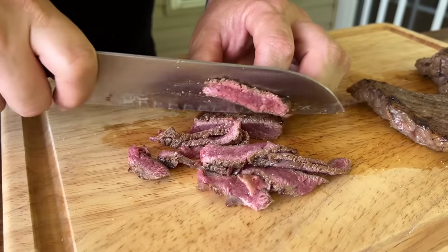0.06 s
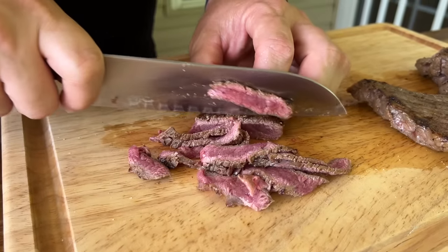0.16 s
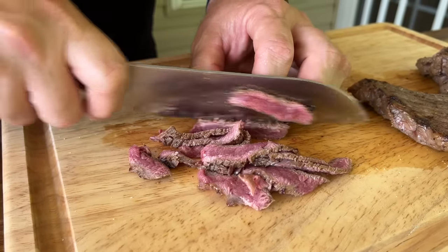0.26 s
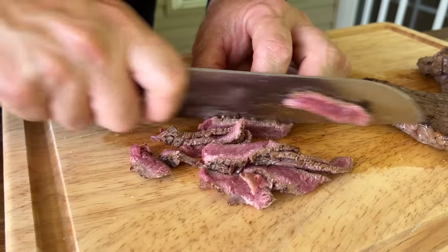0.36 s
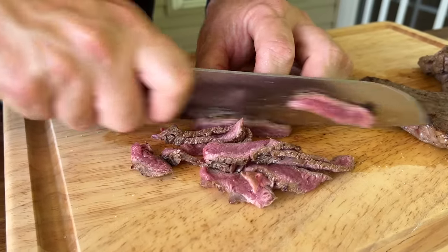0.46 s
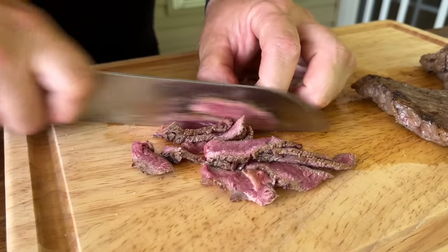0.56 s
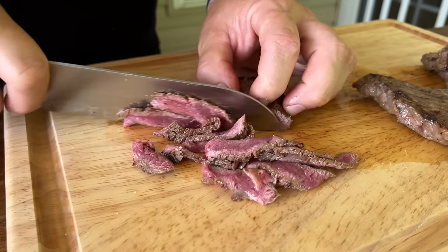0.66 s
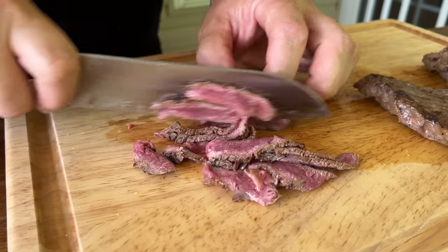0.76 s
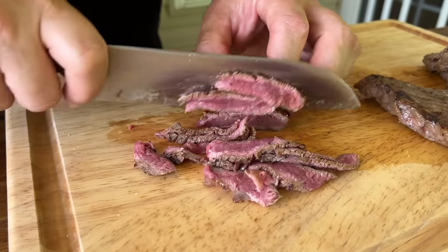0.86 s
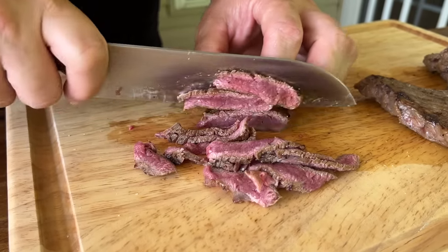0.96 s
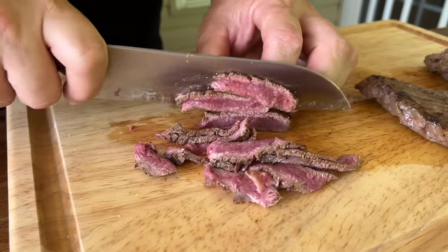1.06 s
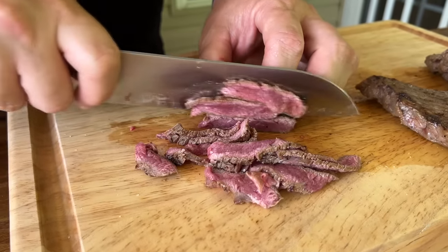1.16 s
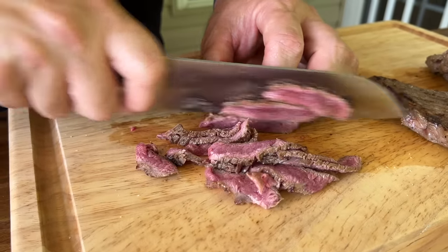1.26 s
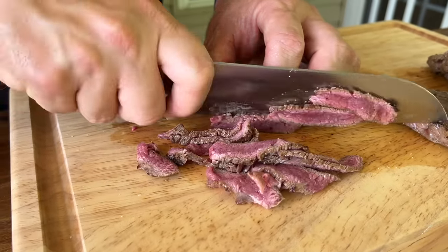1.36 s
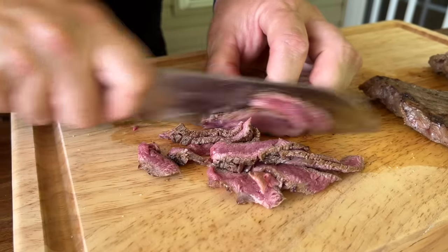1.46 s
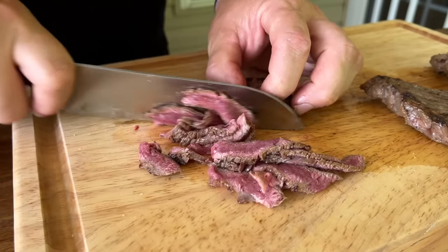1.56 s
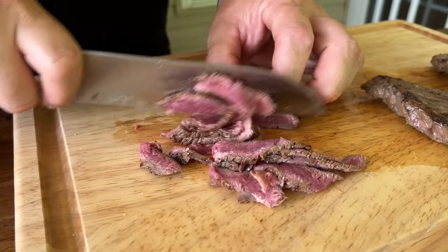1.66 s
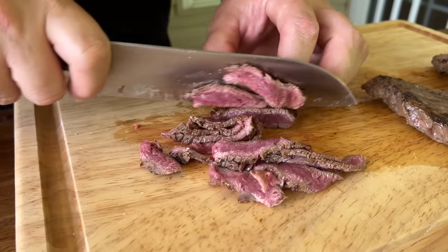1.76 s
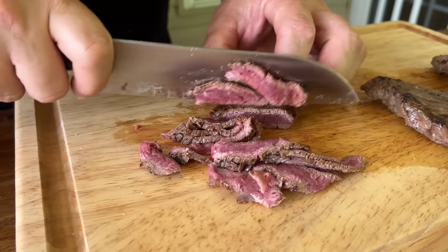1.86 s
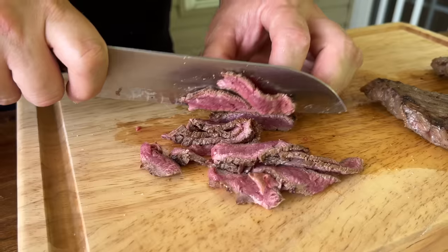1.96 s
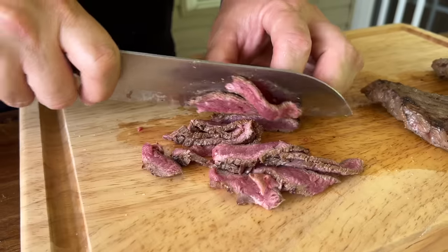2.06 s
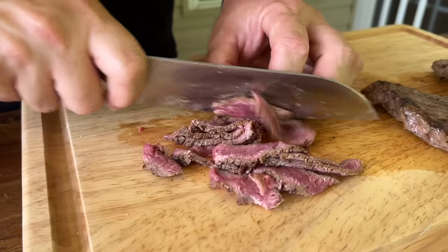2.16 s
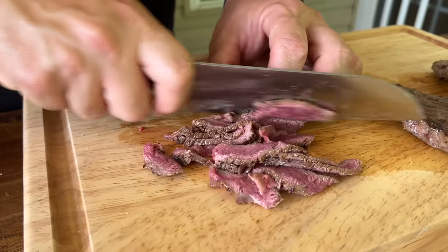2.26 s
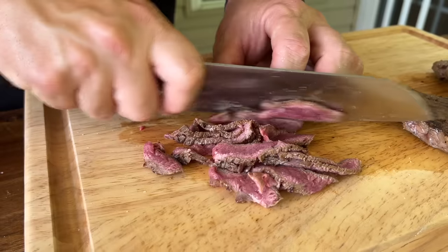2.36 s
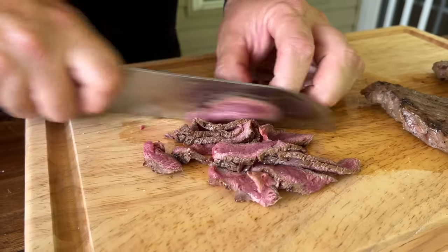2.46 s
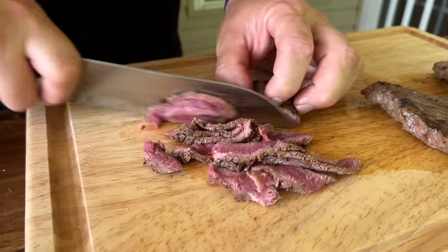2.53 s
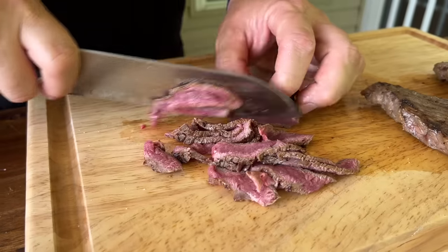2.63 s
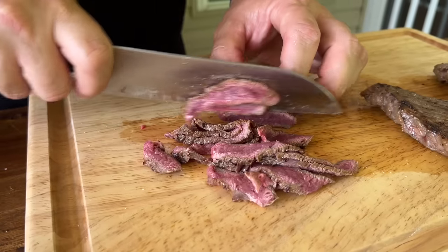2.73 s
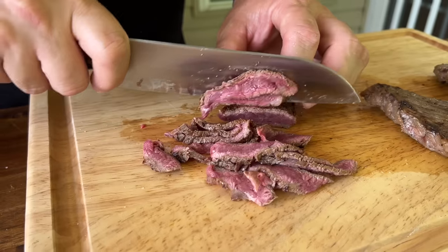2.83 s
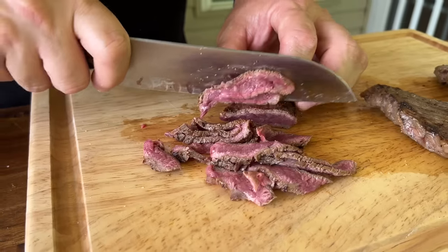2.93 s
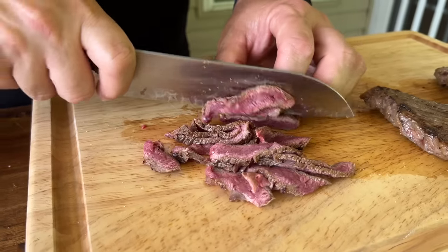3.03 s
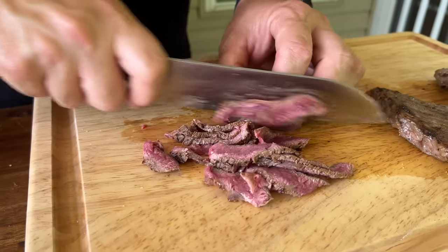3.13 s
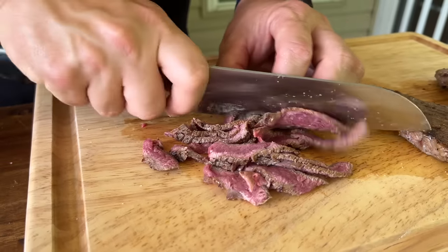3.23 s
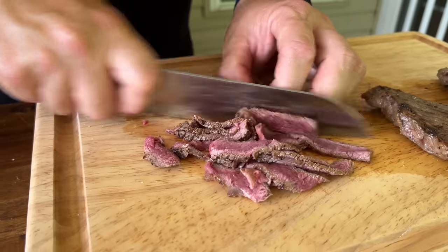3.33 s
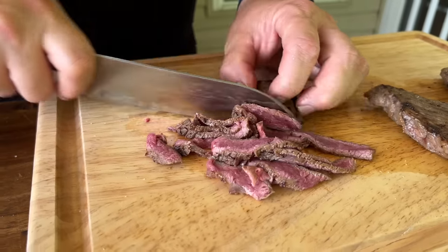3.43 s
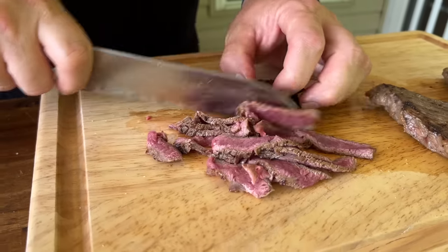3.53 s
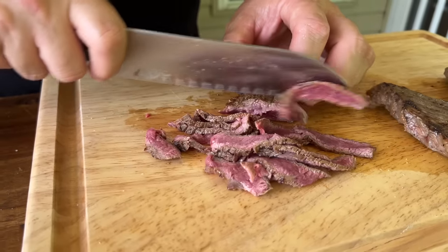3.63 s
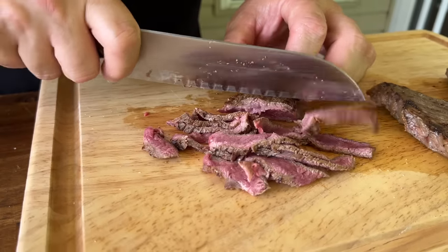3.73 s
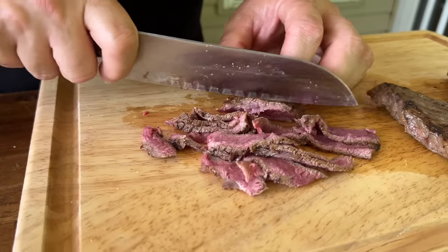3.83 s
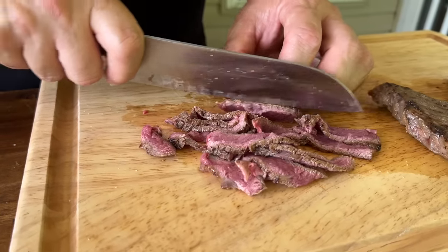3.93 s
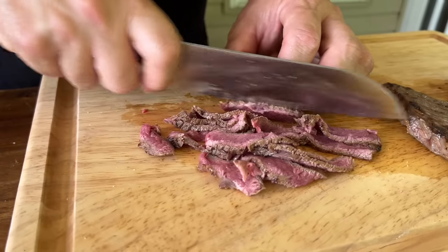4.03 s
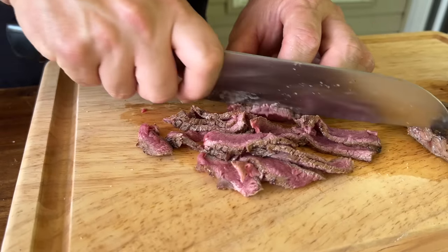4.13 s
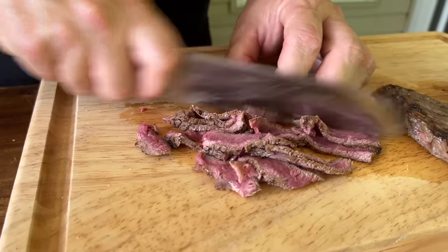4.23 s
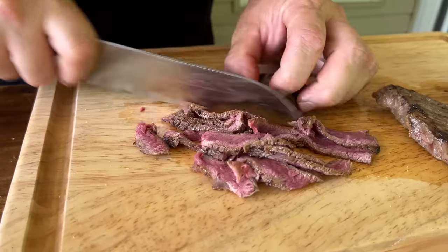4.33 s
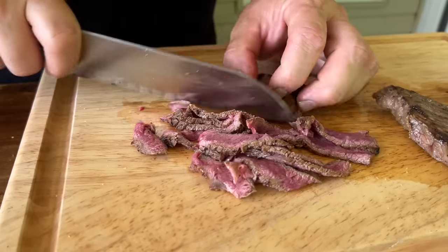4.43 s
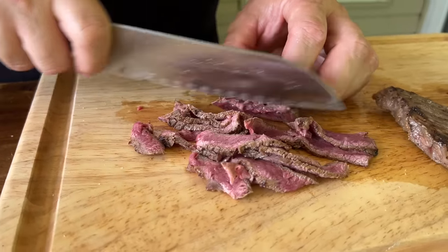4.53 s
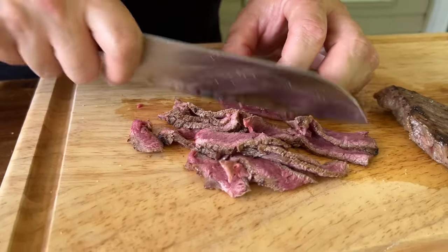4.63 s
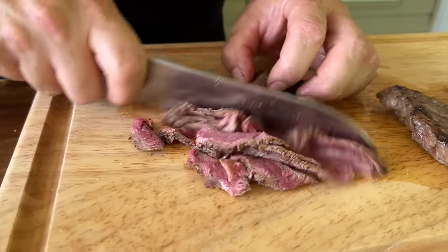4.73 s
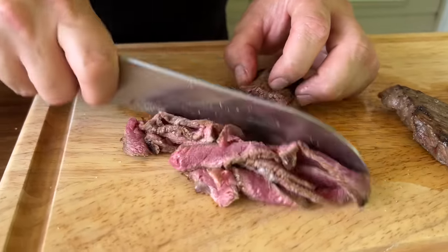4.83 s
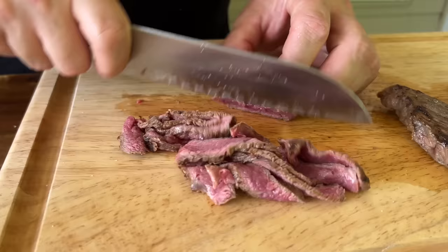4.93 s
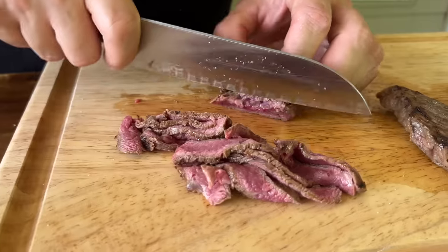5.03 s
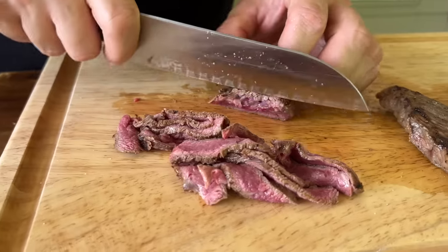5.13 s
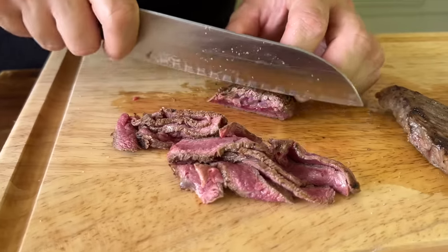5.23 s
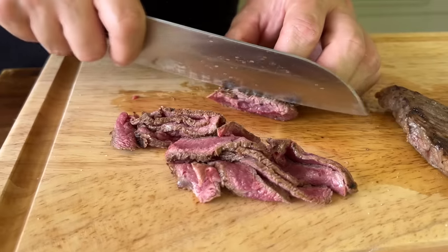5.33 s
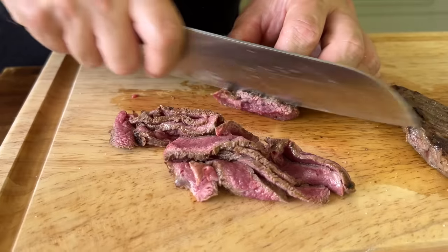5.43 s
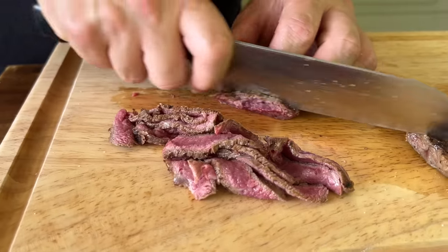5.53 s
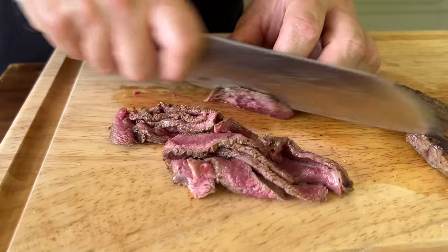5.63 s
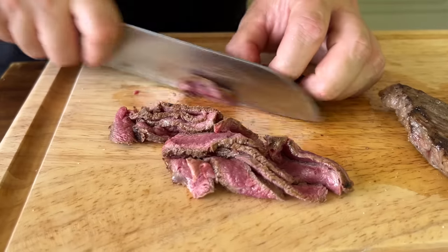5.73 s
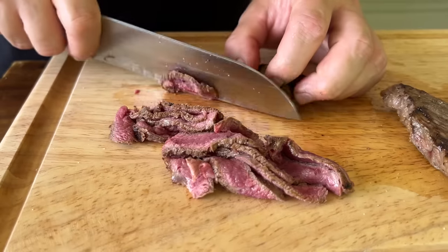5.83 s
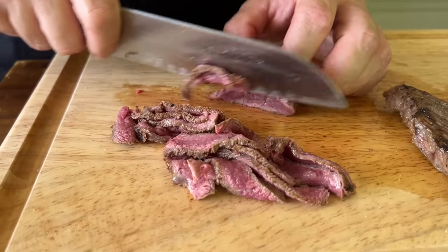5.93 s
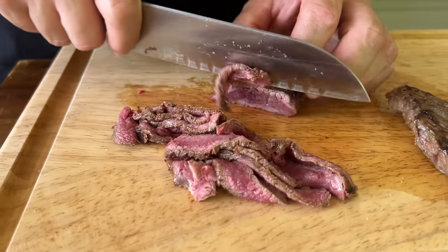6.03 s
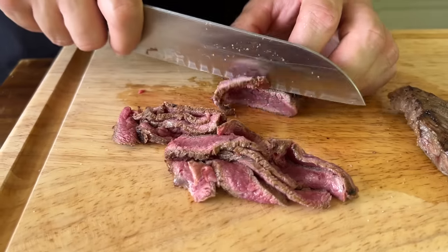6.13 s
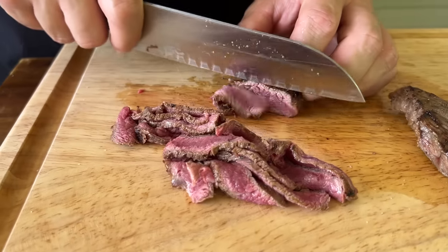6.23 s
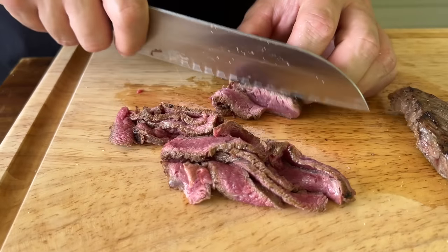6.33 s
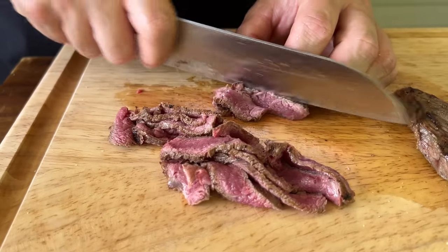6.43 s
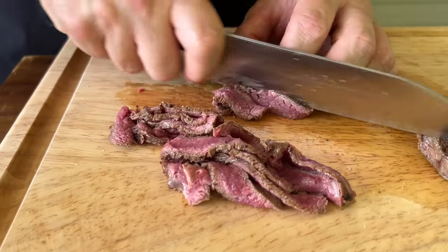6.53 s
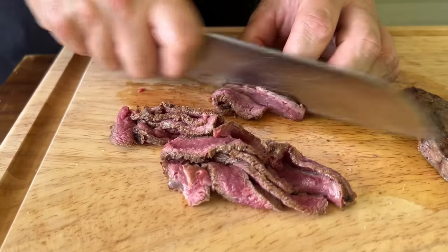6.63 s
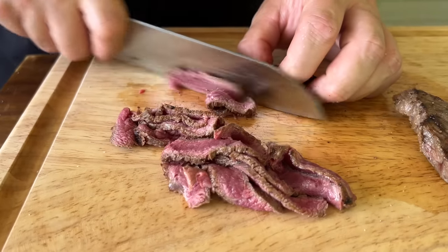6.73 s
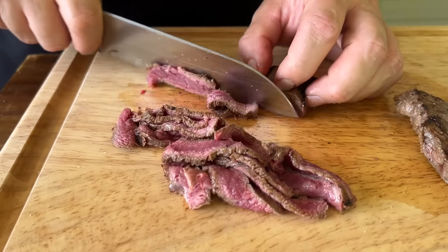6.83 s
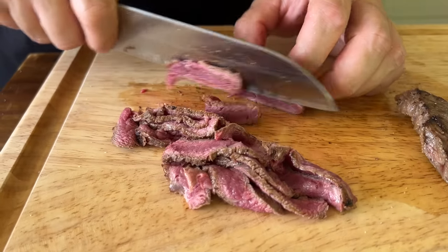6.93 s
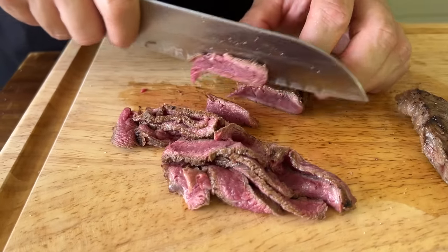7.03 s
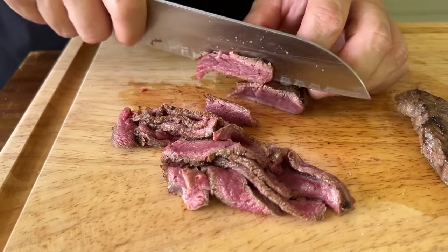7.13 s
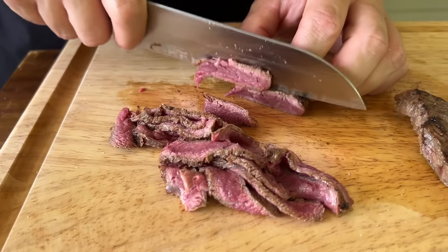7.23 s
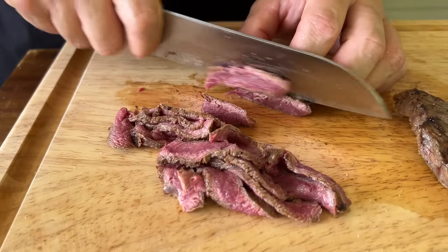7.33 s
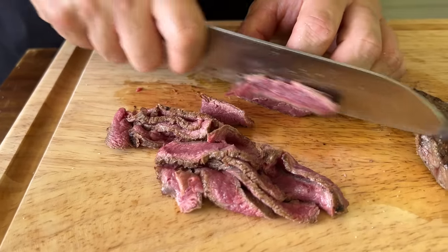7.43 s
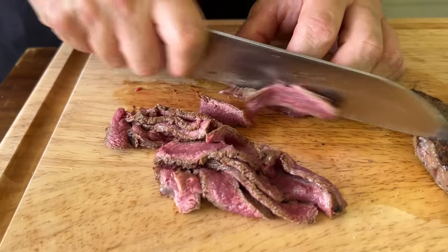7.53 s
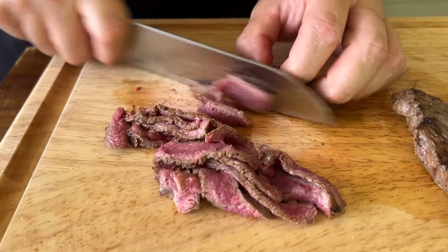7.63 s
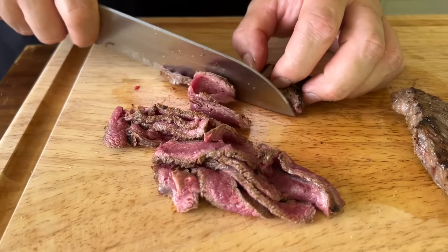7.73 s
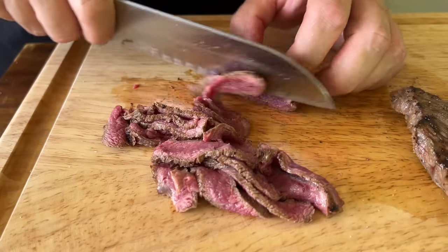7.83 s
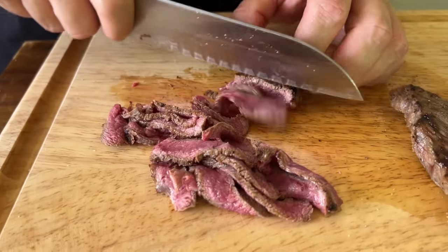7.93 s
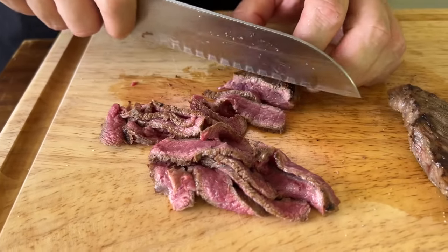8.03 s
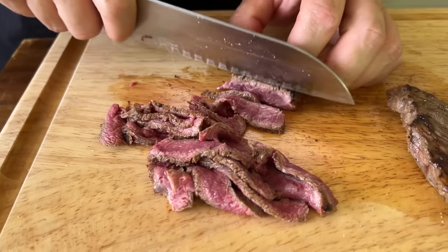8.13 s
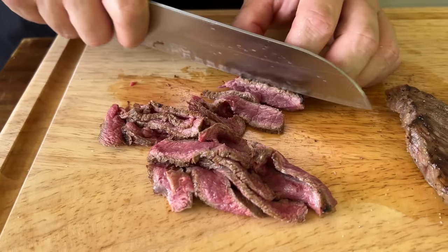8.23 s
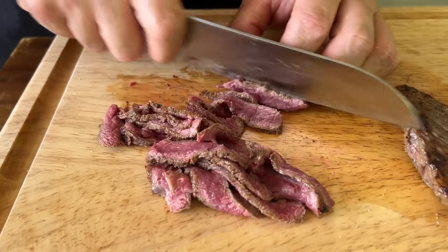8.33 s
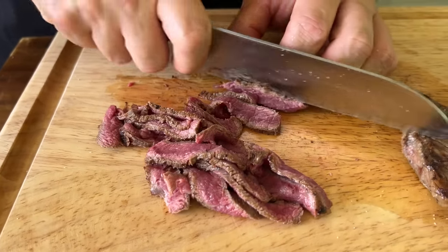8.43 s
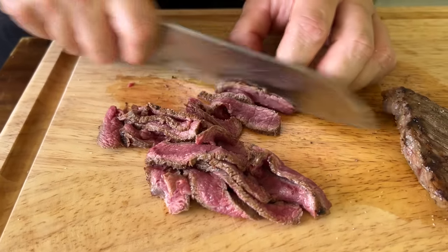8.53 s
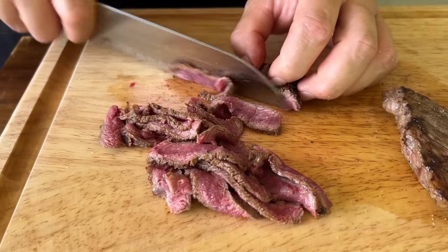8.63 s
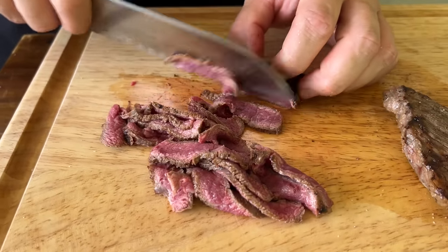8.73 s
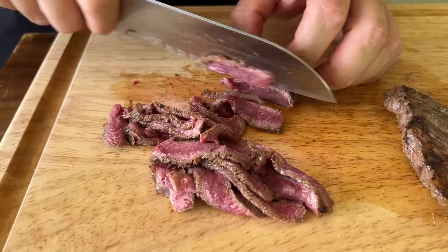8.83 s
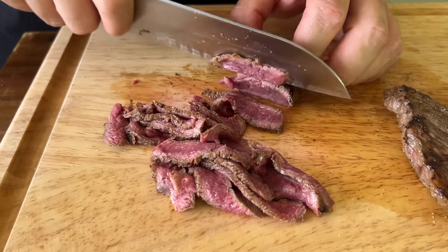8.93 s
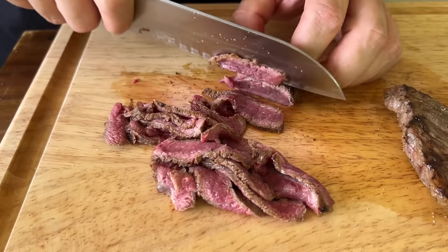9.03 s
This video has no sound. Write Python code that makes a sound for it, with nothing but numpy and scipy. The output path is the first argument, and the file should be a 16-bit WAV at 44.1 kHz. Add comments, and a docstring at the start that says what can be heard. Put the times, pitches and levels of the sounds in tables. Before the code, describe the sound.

Ten woody blade knocks land at an unhurried, regular pace, some soft and cushioned by meat, others sharp and loud. Fat hisses and pops continuously on the left, livelier in the first half. Just after the sixth knock the blade sweeps slices aside with a very short ringing rasp. Soft airy background and low breeze thumps surround the close board, with short reflections from nearby surfaces.

```python
"""Slicing meat beside a sizzle

A knife slices meat on a wooden board: each knock sets the wood's resonances ringing, with echoes and a room tail.
Once the blade sweeps the slices aside, and its rubbing noise rings in the steel.
On the left something sizzles and spits: noise and short bursts, differing in colour and phase at two microphone ports.
Gusts rumble on the ports as low noise, over a soft floor of air noise. The whole level dips once, briefly."""
import sys
import numpy as np
from scipy import signal
from scipy.fft import rfft, irfft
from scipy.io import wavfile

SR = 44100
rng = np.random.default_rng(int(sys.argv[2]) if len(sys.argv) > 2 else 0)


def volts_from_decibels(level):
    """Turn decibel levels (scalar or array-like) into linear amplitude factors."""
    exponent = np.asarray(level, float) / 20
    return 10 ** exponent


def master_out(mix):
    """Clip the mix to full scale and print it as 16-bit PCM to the path in sys.argv[1]."""
    frames = np.transpose(np.atleast_2d(mix))
    ceiling = np.clip(frames, -1, 1)
    pcm = np.round(ceiling * 32767).astype(np.int16)
    wavfile.write(sys.argv[1], SR, pcm)


N = 400428   # length in samples


def rms_one(x):
    """Scale to an rms of 1."""
    return x / np.sqrt(np.mean(x ** 2) + 1e-20)


def in_time(rows):
    """Draw straight lines between (seconds, value) points, giving a value for every sample."""
    seconds, value = np.transpose(rows)
    return np.interp(np.arange(N) / SR, seconds, value)


def coloured(x, spectrum):
    """Filter by (Hz, dB) points, joined on a logarithmic frequency axis."""
    hz = np.maximum(np.fft.rfftfreq(N, 1 / SR), 1)
    at, level_db = np.transpose(spectrum)
    gain = volts_from_decibels(np.interp(np.log(hz), np.log(at), level_db))
    return irfft(rfft(x) * gain, N)


def drift(rate_hz):
    """Slow random wandering: noise smoothed by two equal low-pass stages, scaled to a spread of 1."""
    r = np.exp(-2 * np.pi * rate_hz / SR)
    noise = rng.standard_normal(N + SR)
    return rms_one(signal.lfilter([1], [1, -2 * r, r * r], noise)[SR:])   # first second lets the filter settle


def ring(x, hz, t60):
    """A resonance: a unit click starts a sine of height 1 that falls by 60 dB in t60 seconds."""
    r, w = volts_from_decibels(-60 / (t60 * SR)), 2 * np.pi * hz / SR
    return signal.lfilter([0, np.sin(w)], [1, -2 * r * np.cos(w), r * r], x + 1e-18)


def pair(likeness):
    """Two noises, one per port, that share part of themselves."""
    alike = np.clip(likeness, 0, 1)
    mid, side = rng.standard_normal((2, N))
    return np.sqrt(1 + alike) * mid + np.sqrt(1 - alike) * side * [[1], [-1]]


# Colour of the air noise. Each row: frequency in Hz, relative level in dB per Hz.
AIR_COLOUR = [(15, -34), (25, -30), (76, 0), (238, -9.5), (659, -20), (972, -15.5), (1200, -32),
              (1560, -81), (2640, -120)]


def air():
    """Steady soft noise, mostly low and largely shared by both ports."""
    air_db = -51.5
    return volts_from_decibels(air_db) * rms_one(coloured(pair(0.78), AIR_COLOUR))


# Gusts on the ports. Each row: start of full strength in seconds, time held in seconds,
# level in dB before the random flutter.
GUSTS = [(1.2, .05, -44), (1.397, 0.079, -31.5), (1.798, 0.054, -33.5), (2.634, 0.086, -50),
         (3.486, .05, -35), (3.8, 0.076, -45), (4.054, .13, -45.5), (4.453, 0.33, -31), (5.1, 0.2, -45),
         (5.447, .17, -39), (5.717, 0.054, -51), (7.084, 0.039, -41), (7.89, 0.031, -42)]
# Colour of the wind. Each row: frequency in Hz, relative level in dB per Hz.
GUST_COLOUR = [(13, -38), (22, 1), (86, 3.5), (113, -6.5), (170, -14.5), (300, -28.5), (390, -54),
               (660, -120)]
# Light wind between the gusts. Each row: time in seconds, level in dB before the random flutter.
BREEZE = [(0, -48), (1.6, -45.5), (3, -49), (5.7, -48), (6.2, -51), (9.08, -51)]
GUST_RISE_S, GUST_FALL_S = 0.016, 0.022


def wind():
    """Lumpy low turbulence, largely shared by both ports; each gust swells, holds and falls away."""
    t, level = np.arange(N) / SR, volts_from_decibels(in_time(BREEZE))
    for start, length, db in GUSTS:
        rise = (t - start) / GUST_RISE_S + 1
        fall = (start + length - t) / GUST_FALL_S + 1
        level = level + volts_from_decibels(db) * np.clip(np.minimum(rise, fall), 0, 1) ** 2
    flutter = volts_from_decibels(2.0 * drift(13.0))
    return level * flutter * rms_one(coloured(pair(0.86), GUST_COLOUR))


# The right port against the left for a source on the left. Each row: frequency in Hz, level in dB,
# phase turn in radians, likeness from 0 to 1.
FAR_PORT = [(305, -1, 6, 0.1), (685, -4, -4, 1), (1100, -2.5, -3, 0.59), (2040, -1.5, -5, 0.46),
            (2290, 0.5, -6, 1), (2740, -6, -8, 0.89), (4000, -9, -8, 1), (5000, -17, -9, 0),
            (5850, -10, -7.5, 1), (5750, -31, -9, 0.1), (6570, -2.5, -8, 0.52), (8920, -3, -4, 0.4),
            (9100, 0, -np.pi, 1), (10900, 0, -np.pi, 1), (11580, 0.5, -3.7, 0), (12200, 0, 0, 1),
            (14700, 0, 0, 1), (15100, 2, 5, .4), (15900, -13, -12, .75)]


def from_left(direct, diffuse):
    """The right port hears the direct sound reshaped in level and phase, topped up by diffuse sound."""
    hz = np.fft.rfftfreq(N, 1 / SR)
    at, level_db, turn, alike = np.transpose(FAR_PORT)
    alike = np.clip(np.interp(hz, at, alike), 0, 1)
    shared = alike * np.exp(1j * np.interp(hz, at, turn)) * rfft(direct)
    mix = shared + np.sqrt(1 - alike ** 2) * rfft(diffuse)
    return np.array([direct, irfft(mix * volts_from_decibels(np.interp(hz, at, level_db)), N)])


def bursts(sizes, length_ms):
    """Each click becomes a short dying burst of noise."""
    r = np.exp(-1000 / (length_ms * SR))
    fading = signal.lfilter([1], [1, -r], np.abs(sizes))
    return sizes + 0.83 * fading * rng.standard_normal(N)


# Level of hiss and crackle together at the left port. Each row: time in seconds, level in dB.
SIZZLE = [(0.0, -39), (3.92, -39.5), (6.47, -40), (9.08, -40)]
# Their colour at the left port. Each row: frequency in Hz, relative level in dB per Hz.
SIZZLE_COLOUR = [(300, -11), (600, -6.5), (1500, -4.5), (2500, -4), (4000, -3), (5300, 0.5), (6200, -3.5),
                 (7100, -8), (8400, -6), (10500, -11), (14300, -14), (15600, -15)]


def frying(dull, sharp):
    """A dense hiss, random crackle of uneven size, and the louder spits with a dull and a sharp part."""
    hiss = rng.standard_normal(N) * volts_from_decibels(1.27 * drift(13))
    born = rng.random(N) < 150 * volts_from_decibels(3.0 * drift(2)) / SR   # crackles come at a wandering rate
    size_db = 4.1 * np.minimum(rng.exponential(1, N), 3.2)
    crackle = born * volts_from_decibels(size_db) * rng.choice([-1, 1], N)
    bed = hiss + 0.45 * rms_one(bursts(crackle, length_ms=0.89))
    bed = volts_from_decibels(in_time(SIZZLE)) * rms_one(coloured(bed, SIZZLE_COLOUR))
    body = coloured(bursts(dull, length_ms=2.74),
                    [(400, 4), (900, 6.5), (2000, 10), (3200, 11.5), (5000, 4), (9000, -40)])
    snap = coloured(bursts(sharp, length_ms=2.67), [(1500, -33), (4000, 10.5), (6500, 1.5), (12000, -5.5)])
    return bed + body + snap


# Louder spits of fat. Each row: time in seconds, size of the dull click in dB before colouring,
# sharp click against the dull one in dB before colouring.
SPITS = [(0.0213, -35.5, 5.5), (0.0557, -28, -9), (0.2013, -29, 4.5), (0.2741, -28.5, 4),
         (0.6737, -28.5, -2), (1.2785, -25, 1), (1.5724, -24.5, -7), (1.712, -30, -16), (1.963, -30, 6.5),
         (2.2387, -31.5, 1), (2.4012, -26, 1), (2.671, -30, -6), (3.1205, -26.5, -17), (3.1807, -30.5, 0.0),
         (3.5866, -29, 5), (3.6227, -36.5, 12.5), (3.7187, -26.5, 1), (4.3954, -30, -2), (4.791, -34, 6),
         (4.9036, -29.5, -5.5)]
# Lesser spits come at random and turn rare around the fade time; their size is a middle value before colouring.
SMALL_SPITS_PER_S, SMALL_SPIT_DB, SPITS_FADE_S = 4.5, -34, 5.2


def sizzle():
    """Direct and diffuse frying share the same spits but have separate hiss and crackle."""
    t = np.arange(N) / SR
    rate = SMALL_SPITS_PER_S / (1 + np.exp((t - SPITS_FADE_S) / .4))
    dull = (rng.random(N) < rate / SR) * volts_from_decibels(SMALL_SPIT_DB + 2.3 * rng.standard_normal(N))
    sharp = dull * volts_from_decibels(-8 + 5.6 * rng.standard_normal(N))
    for start, dull_db, sharp_db in SPITS:
        i = round(start * SR)
        dull[i], sharp[i] = volts_from_decibels(dull_db), volts_from_decibels(dull_db + sharp_db)
    return from_left(frying(dull, sharp), frying(dull, sharp))


# Colour of the room. Each row: frequency in Hz, gain in dB.
ROOM_COLOUR = [(150, -8), (280, 1), (420, -10.5), (700, -1.5), (1300, -2), (2200, -5.5), (4000, -20),
               (10000, -41)]
ROOM_T60_S, ROOM_ONSET_S = 0.27, 0.0042   # time to fall by 60 dB, first diffuse reflections


def room(x):
    """Dense dying reflections from table and walls, different at each port; the treble dies first."""
    t = np.arange(SR // 2) / SR
    clumps = volts_from_decibels(1.8 * drift(170)[:len(t)])   # reflections come in clumps
    noise = rng.standard_normal((2, len(t))) * clumps
    low = signal.sosfilt(signal.butter(2, 1400, fs=SR, output="sos"), noise)
    high = (noise - low) * volts_from_decibels(-60 * t / 0.17)   # extra loss on top of the common decay
    fade_in = np.clip((t - ROOM_ONSET_S) / 0.0053, 0, 1)
    tail = (low + high) * volts_from_decibels(-60 * t / ROOM_T60_S) * fade_in
    tail = tail / np.sqrt(np.sum(tail ** 2, axis=1, keepdims=True))
    return coloured(signal.fftconvolve(x[None], tail, axes=1)[:, :N], ROOM_COLOUR)


# Blade dragged sideways over the wood. Each row: time in seconds, relative level in dB.
SWEEP = [(4.69, -34), (4.701, -50), (4.71, -31.5), (4.72, -23.5), (4.728, -35), (4.74, -34.5), (4.76, -46)]
# Blade resonances. Each row: frequency in Hz, width in Hz, relative level in dB.
BLADE = [(2370, 68, -11), (3570, 28, 2.5), (4630, 15, -13.5), (6580, 83, -1), (7830, 70, -10),
         (10400, 74, -35), (11170, 70, -13.5), (15300, 97, -11)]
GLIDE = .05   # share by which the lower rings sink as the sweep slows


def sweep():
    """Rough friction noise rings in the blade's resonances above a thin broad scratch."""
    rub = rng.standard_normal(N) * volts_from_decibels(2.1 * drift(160))
    t, start, end = np.arange(N) / SR, SWEEP[0][0], SWEEP[-1][0]
    progress = np.clip((t - start) / (end - start), 0, 1)
    rings = 0
    for hz, width, db in BLADE:
        sink = GLIDE * (hz < 4000) * (.5 - progress)
        r = np.exp(-np.pi * 1.5 * width / SR)
        wobble = signal.lfilter([1], [1, -r], rub + 1j * rub[::-1])   # noise band round zero
        carrier = np.exp(2j * np.pi * hz * np.cumsum(1 + sink) / SR)   # moves the band up to the resonance
        rings = rings + volts_from_decibels(db) * np.sqrt(width) * rms_one(np.real(wobble * carrier))
    two_rubs = np.array([rub, .5 * rub + rub[::-1]])
    scratch = coloured(two_rubs, [(1500, -17), (5000, -40), (11000, 0), (15000, 13)])
    on = np.interp(t, [start - .01, start, end, end + .01], [0, 1, 1, 0])
    return on * volts_from_decibels(in_time(SWEEP)) * (rms_one(rings) * 0.88 + rms_one(scratch) * 0.98)


# Blade lands on the board. Each row: tip touch in seconds, peak in dB before echoes and port balance,
# lag from tip touch to flat landing in ms, boost of the low thud in dB, boost of the crack in dB.
KNOCKS = [(0.5398, -17.5, 1.46, -4, -13), (1.478, -17.5, 1.46, -1.5, -6), (2.446, -12, 1.37, -1, -9),
          (3.3236, -11.5, 0.75, 0, -1), (4.2503, -2.0, 0.8, -2, 2), (4.6746, -9, 0.73, -4, 0.5),
          (5.6828, -22, 1.46, -2.5, 7), (6.672, -12.5, 1.42, -3.5, -10), (7.5927, -1.5, 0.79, -5.5, -0.5),
          (8.5612, -17.5, 1.4, -2.5, -17)]
# Ways the board rings. Each row: frequency in Hz, relative level in dB, time to fall by 60 dB in seconds.
BOARD = [(267, -5, 0.04), (490, 1.5, 0.0073), (715, 6, 0.019), (984, -0.5, 0.024), (1233, -5.5, 0.013),
         (1740, -15.5, 0.047), (1850, -7.5, 0.0049), (2260, -2.5, 0.0094), (2700, -10.5, 0.0072),
         (3180, -11.5, 0.014)]
# Weak landings are cushioned by meat and last longer.
FIRM_CONTACT_MS, FIRM_ABOVE_DB, CUSHION_MS_PER_DB = 0.21, -12.5, .055
# Tip touch and rebound against the flat landing; the rebound comes this long after the tip.
TIP_SHARE, REBOUND_SHARE, REBOUND_S = 0.66, 0.35, 0.00297


def knocks():
    """Half-sine pushes of tip, flat blade and rebound ring the board; returns the rings and the bare blows."""
    rings, blows, t = np.zeros(N), np.zeros(N), np.arange(SR // 4) / SR
    chance_db = rng.standard_normal((len(KNOCKS), len(BOARD)))
    tick = np.diff(rng.standard_normal(len(t) + 1))
    no_bass = signal.butter(2, 170, "high", fs=SR, output="sos")
    for (start, peak_db, lag_ms, thud_db, crack_db), luck_db in zip(KNOCKS, chance_db):
        cushion_ms = CUSHION_MS_PER_DB * max(FIRM_ABOVE_DB - peak_db, 0)
        contact_ms = max(FIRM_CONTACT_MS + cushion_ms, .05)   # longer contacts sound duller
        push = lambda lag: np.sin(np.pi * np.clip((t - lag) / (contact_ms / 1000), 0, 1))
        force = TIP_SHARE * push(0) + push(lag_ms / 1000) - REBOUND_SHARE * push(REBOUND_S)
        hit = 0
        for k, (hz, db, t60) in enumerate(BOARD):
            level_db = db + luck_db[k] + thud_db * (hz < 400) + crack_db * (hz > 1500)
            sign = (-1) ** max(k - 1, 0)   # upper neighbours swing in opposition
            hit = hit + sign * volts_from_decibels(level_db) * ring(force, hz, t60)
        hit = signal.sosfilt(no_bass, hit)   # a small board radiates no bass
        bite = tick * np.exp(-t / .002)   # steel edge bites the grain
        hit = hit + volts_from_decibels(crack_db - 32.0) * np.abs(hit).max() * bite
        i = round(start * SR)
        rings[i:i + len(t)] += (volts_from_decibels(peak_db) * hit / np.abs(hit).max())[:N - i]
        blows[i:i + len(t)] += (volts_from_decibels(peak_db) * push(0) / (contact_ms / 0.23))[:N - i]
    return rings, blows


def table(blows):
    """The table under the board shudders: the blows set one low resonance ringing."""
    shudder = ring(blows, hz=87, t60=0.085)
    return volts_from_decibels(-38) * signal.sosfilt(signal.butter(2, 190, fs=SR, output="sos"), shudder)


# Nearby hard surfaces throw the knock back. Each row: delay in seconds, gain in dB.
ECHOES = [(.0112, -19), (.0152, -17.5), (.0332, -25)]


def thrown_back(rings):
    """Delayed, weaker copies of the middle band of the knocks."""
    middle = signal.sosfilt(signal.butter(2, [500, 1500], "band", fs=SR, output="sos"), rings)
    return sum(volts_from_decibels(db) * np.roll(middle, round(lag * SR)) for lag, db in ECHOES)


def scene():
    """Board in front, frying on the left, wind and air all round."""
    rings, blows = knocks()
    board = rings + thrown_back(rings) + sweep() + table(blows)
    balance = volts_from_decibels([[.5], [-.5]])   # dB at left and right port
    return board * balance + room(blows) + sizzle() + wind() + air()


def low_pass(x):
    """Removes everything above the highest recorded frequency."""
    return signal.sosfilt(signal.butter(12, 16500, fs=SR, output="sos"), x)


DIP_S, DIP_WIDTH_S, DIP_DEPTH = 1.83, .004, .85   # depth is the share of the level lost at the middle
TOP_HZ, MIC_LOW_HZ = 15800, 33.8


def record(dry):
    """The level dips briefly, then steep and gentle filters cut off the top and the bottom."""
    dip = 1 - DIP_DEPTH * np.exp(-((np.arange(N) / SR - DIP_S) / DIP_WIDTH_S) ** 2)
    cut = signal.sosfilt(signal.ellip(10, .5, 60, TOP_HZ, fs=SR, output="sos"), dry * dip)
    cut = signal.sosfilt(signal.butter(2, MIC_LOW_HZ, "high", fs=SR, output="sos"), cut)
    return low_pass(cut)


dry = scene()
out = record(dry)
master_out(out)
```